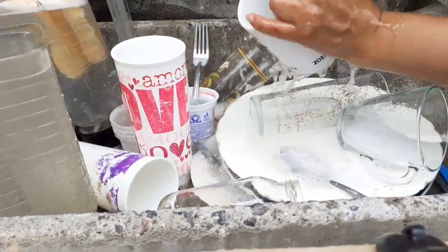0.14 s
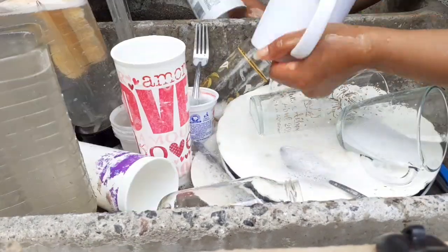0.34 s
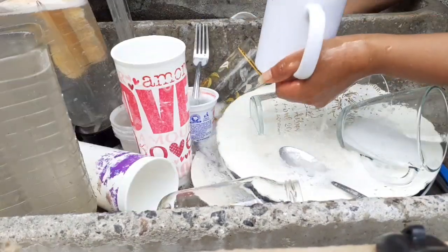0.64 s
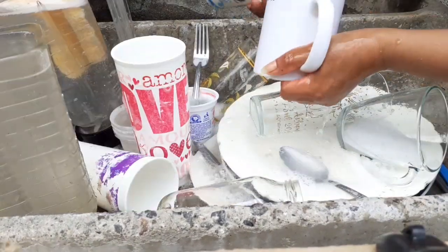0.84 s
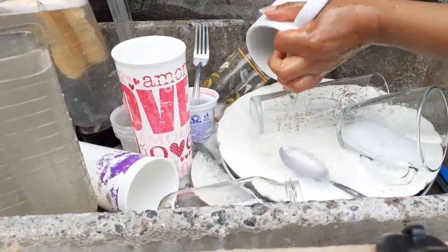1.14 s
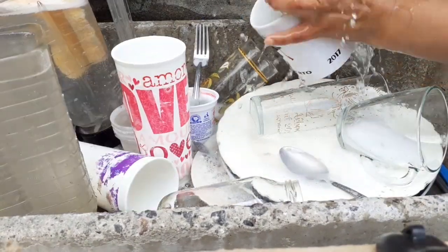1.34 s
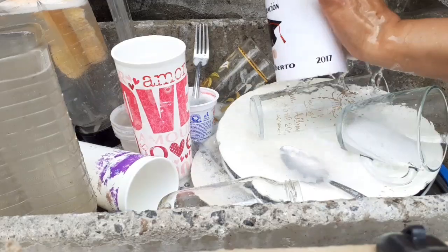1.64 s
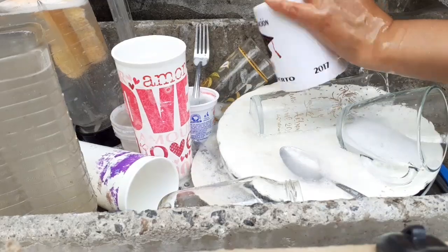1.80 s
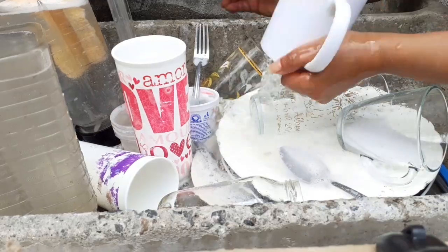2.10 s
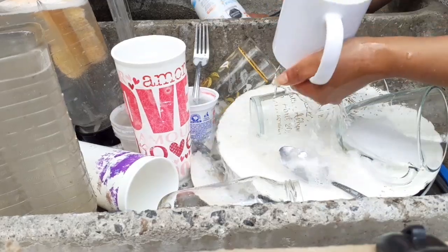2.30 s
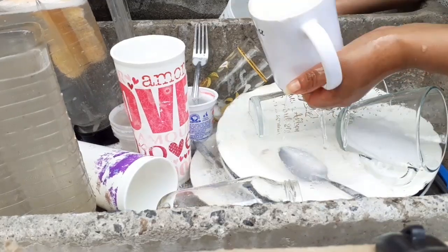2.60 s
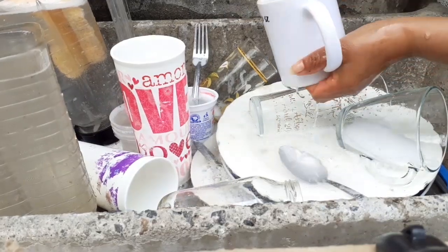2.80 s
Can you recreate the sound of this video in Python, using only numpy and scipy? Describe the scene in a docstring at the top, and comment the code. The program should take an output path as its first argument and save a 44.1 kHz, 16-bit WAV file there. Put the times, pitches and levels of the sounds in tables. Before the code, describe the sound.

Water splashes and burbles close up as a mug is rinsed in an outdoor stone basin. Small plops open; a loud hollow gulp and splash come at 0.5-0.6 s, then sparse drips and sharp slaps from 1.0 to 1.8. A dull crockery knock with a splash lands at 1.9, busier bright splashes follow at 2.0-2.5 with strong low wind buffets on the right, then it thins out.

```python
"""An outdoor stone sink: hands rinse a mug under a running tap, heard close on two microphone ports. Shaped
noise makes the breeze, mostly on the right port, and the tap's wash and spray. Crowds of tiny rings make fizz
and burbles; single climbing rings make bubble plops. Noise bursts with a pitched tick make slaps; groups of
rings make the mug's gulps and a quick burst of low bubbles. Scattered echoes of the plops, slaps, gulps and
bubble burst stand for the stone basin."""
import sys
import numpy as np
from scipy import signal
from scipy.io import wavfile
from scipy.ndimage import uniform_filter1d

SR = 44100
rng = np.random.default_rng(int(sys.argv[2]) if len(sys.argv) > 2 else 0)


def decibels_to_gain(level_db):
    """Convert a level in decibels to a linear amplitude gain (20 dB per decade)."""
    exponent = np.asarray(level_db, float) / 20
    return 10 ** exponent


def store_pcm(level_fs):
    """Save levels as 16-bit WAV."""
    pcm = np.round(np.clip(level_fs, -1, 1) * 32767).astype(np.int16)
    wavfile.write(sys.argv[1], SR, np.atleast_2d(pcm).T)


N = 130095  # samples

# Levels in these tables are relative: the functions below trim them.
# likeness of right port to left: pitch_hz, likeness (0-1)
PORT_LIKENESS = [(60, .15), (180, 1), (550, 0.15), (1650, 0.032), (5000, 0.048), (9000, 1), (15000, 0.98)]
# balance of the ports: pitch_hz, left_minus_right_db
PORT_LEAN = [(500, -2), (2400, -1.5), (8000, -7.5), (11000, 4), (15000, -1)]
# breeze at the ports: time_s, strength_db, left_minus_right_db
BREEZE = [(0.0, -55.5, 3), (0.17, -42.5, -15.5), (0.21, -31.5, -31), (0.25, -33.5, -30), (0.29, -49, -22),
          (0.34, -45.5, -15), (0.46, -28, -28), (0.5, -30, -14), (0.57, -56.5, -3), (0.72, -49, 22),
          (0.88, -48, -5), (1.01, -44, -12), (1.08, -67, 5), (1.125, -36.5, -16), (1.2, -43, 12),
          (1.23, -59, 10), (1.26, -42, -15), (1.47, -44, -10), (1.51, -38, 21), (1.55, -45, 8),
          (1.79, -54.5, 4), (1.83, -36, -16), (1.97, -56, 6), (2.08, -45.5, -3), (2.14, -66, 5),
          (2.18, -24, -35), (2.26, -41.5, -12), (2.3, -29, -14), (2.36, -21.5, -49), (2.4, -40.5, -16),
          (2.44, -27.5, -24), (2.51, -49.5, 0), (2.55, -33.5, -20), (2.58, -53, 6), (2.65, -35, -24),
          (2.69, -34.5, -20), (2.73, -49, 2), (2.78, -56, 3), (2.82, -46, -12), (2.91, -38, 0),
          (2.95, -39, -19)]
# colour of the low wind rumble: pitch_hz, level_db (per Hz)
RUMBLE_COLOUR = [(12, -67), (20, -59), (56, -1.5), (107, -2), (316, -23.5), (392, -44), (464, -36),
                 (600, -45), (780, -64), (1320, -120)]
# colour of the higher wind flutter: pitch_hz, level_db (per Hz)
FLUTTER_COLOUR = [(50, -54), (110, 2), (170, -11.5), (260, 8.5), (380, 4), (520, -11.5), (800, -54)]
# sharp buffets on the right port: centre_s, level_db, pitch_hz
RIGHT_BUFFETS = [(0.208, -13.5, 200), (.248, -13, 214), (0.444, -16.5, 150), (1.269, -22, 240),
                 (2.184, -17, 144), (2.284, -17, 135), (2.3086, -4, 215), (2.3267, -7.5, 303),
                 (2.35, -10.5, 136), (2.371, -10.5, 310), (2.437, -18, 207)]
# colour of the steady wash: pitch_hz, level_db (per Hz)
WASH_COLOUR = [(90, -46), (150, -2), (250, -5.5), (343, -0.5), (528, -10), (1120, -18.5), (1790, -18),
               (3700, -23), (7970, -35.5), (9890, -45), (12500, -37), (15600, -40)]
# how much water is falling: time_s, level_db
WATER_FLOW = [(0.0, -49), (0.06, -43), (0.36, -52), (0.48, -46.5), (0.49, -37.5), (0.57, -46),
              (0.59, -40.5), (0.62, -52.5), (1.26, -53.5), (1.27, -41), (1.39, -53.5), (1.48, -46),
              (1.57, -47.5), (1.6, -38.5), (1.62, -47.5), (1.72, -51.5), (1.77, -48), (1.9, -43),
              (1.92, -34.5), (1.95, -50), (2.1, -40.5), (2.13, -52), (2.22, -40), (2.38, -50), (2.4, -44.5),
              (2.47, -50.5), (2.5, -54), (2.95, -55.5)]
# colour of the spray, the fizz and the slaps: pitch_hz, level_db (per Hz)
SPRAY_COLOUR = [(300, -20), (620, -5), (1000, -6), (1870, -7.5), (3350, -8), (8300, -8), (9890, -20),
                (12500, -11.5), (15600, -19)]
# how hard the water churns in mug and basin: time_s, level_db
WATER_CHURN = [(0.0, -92), (0.06, -47), (0.39, -53), (0.4, -45), (0.42, -44), (0.48, -45.5), (0.5, -25.5),
               (0.57, -47), (0.59, -30.5), (0.63, -51), (0.72, -45.5), (1.17, -59), (1.19, -44),
               (1.22, -67), (1.54, -44), (1.77, -56.5), (1.77, -43), (1.79, -49), (1.84, -37), (1.9, -42.5),
               (1.91, -26.5), (1.95, -51.5), (2.14, -54.5), (2.17, -36.5), (2.29, -43.5), (2.3, -35),
               (2.32, -43.5), (2.39, -47), (2.4, -36.5), (2.56, -67), (2.63, -67), (2.65, -43.5),
               (2.67, -50), (2.95, -52)]
# colour of the burbles: pitch_hz, level_db
BURBLE_COLOUR = [(550, 5.5), (800, 2.5), (1200, 1.5), (1900, 5), (2800, -1), (4000, -8)]
# single bubbles: start_s, level_db, pitch_hz, t60_s (before high pitches are shortened)
BUBBLES = [(0.049, -32.5, 3100, 0.056), (0.077, -25, 1470, 0.021), (0.118, -30, 786, 0.073),
           (.146, -41, 808, .07), (0.183, -25, 775, 0.046), (0.205, -28.5, 753, 0.041),
           (0.396, -32.5, 1068, 0.051), (0.45, -32.5, 3050, 0.046), (0.59, -37, 1816, 0.11),
           (0.698, -37, 1447, 0.096), (0.73, -33, 3320, 0.029), (0.762, -44, 1960, 0.43),
           (1.188, -34.5, 2230, 0.069), (1.273, -28.5, 2940, 0.023), (1.359, -36.5, 883, 0.05),
           (1.531, -33.5, 2360, 0.044), (1.598, -28, 3200, 0.025), (1.636, -34.5, 3130, 0.049),
           (1.773, -25, 1600, 0.031), (1.849, -31.5, 720, 0.12), (1.872, -27, 666, 0.084),
           (1.923, -26, 666, 0.077), (1.981, -29, 803, 0.041), (1.987, -29, 1940, 0.019),
           (2.167, -35.5, 615, 0.09), (2.246, -31.5, 1824, 0.049), (2.263, -33.5, 3360, 0.057),
           (2.297, -29.5, 1810, 0.075), (2.332, -35, 788, 0.12), (2.398, -30.5, 780, 0.057),
           (2.446, -31.5, 810, 0.083), (2.634, -39, 840, 0.08), (2.647, -34.5, 1820, 0.1),
           (2.8, -32.5, 806, 0.11), (2.939, -39, 1100, 0.033), (.036, -38.5, 1723, 0.069),
           (0.079, -33, 2730, 0.04), (0.111, -33, 2540, 0.036), (.184, -32, 2660, 0.035),
           (.255, -38, 1864, 0.15), (.494, -25.5, 2870, 0.041), (0.531, -28, 3260, 0.054),
           (0.546, -29, 1760, 0.059), (.587, -27, 3240, .05), (.875, -32, 1594, 0.04),
           (2.69, -41.5, 2600, 0.05), (.96, -49, 4100, 0.16), (1.733, -40, 2240, 0.062),
           (2.145, -38, 2720, 0.056), (1.774, -36, 2990, 0.063), (1.835, -33, 2330, 0.058),
           (1.846, -33.5, 1970, 0.047), (1.96, -31.5, 800, 0.044), (2.0222, -26, 3640, 0.022),
           (2.404, -31.5, 2250, 0.07), (2.448, -27, 1910, 0.034), (2.494, -29.5, 2630, 0.021)]
# slaps of water: start_s, level_db, centre_hz, t60_s, left_minus_right_db
WATER_SLAPS = [(0.1133, -31.5, 5200, 0.062, 2.5), (0.213, -36, 3950, .015, 2),
               (0.4945, -20, 5770, 0.037, -8), (0.574, -25.5, 4450, 0.037, -4),
               (0.591, -21.5, 4520, 0.015, 3.5), (.779, -34, 2900, 0.022, 0), (.825, -36, 13500, .015, 0),
               (0.998, -26.5, 7950, 0.025, -12), (1.0375, -29, 8800, 0.027, -11),
               (1.083, -30.5, 6370, 0.0092, 4.5), (1.1725, -38.5, 7300, 0.062, 6.5),
               (1.27, -26, 6500, 0.025, 0), (1.3438, -39, 4200, 0.082, 1),
               (1.445, -21.5, 7900, 0.0075, 6.5), (1.474, -30, 4660, 0.056, 0.5),
               (1.511, -33.5, 5650, 0.086, 2), (1.6349, -29.5, 4400, 0.031, 1),
               (1.709, -29.5, 4400, 0.028, 2), (1.7728, -34.5, 5800, 0.043, 1.5),
               (1.823, -30, 7250, 0.05, 0.5), (1.909, -36, 8740, 0.038, -1), (1.9187, -36, 7260, 0.023, 0),
               (1.9751, -20.5, 7980, 0.019, 1), (2.0474, -20, 6770, 0.013, -3.5),
               (2.066, -15.5, 13600, 0.013, 0), (2.1803, -25, 4600, 0.042, 0.5),
               (2.2085, -20, 6200, 0.034, -2), (2.221, -30, 4760, 0.028, 6),
               (2.2467, -19, 15500, 0.022, 4.5), (2.26, -24, 4720, 0.027, -3),
               (2.2968, -33, 6200, 0.063, 3), (2.3976, -31, 6860, 0.054, 0.5),
               (2.475, -20, 1480, 0.0093, -3), (2.4935, -29.5, 4250, 0.024, -1.5),
               (2.811, -40.5, 7450, 0.037, 2)]
# gulps of air in the mug: start_s, level_db, emptiness (0-1, raises the pitch)
AIR_GULPS = [(0.4961, -5, 0.03), (.519, -27, 0.08), (0.531, -8, 0.01), (0.5399, -18.5, 0),
             (.574, -18, 0.05), (.587, -24, 0.1), (.61, -31, 0.1), (2.404, -17, 0.1), (2.44, -24.5, 0.08),
             (2.468, -25, 0.16)]
# resonances of the air in the mug: pitch_hz, level_db, t60_s
MUG_AIR = [(310, -2.5, 0.05), (413, -1.5, 0.092), (800, -13, 0.022)]
# a quick burst of low bubbles under water: start_s, level_db, pitch_hz, t60_s
BUBBLE_BURST = [(1.909, -12, 702, 0.022), (1.9075, -18, 1510, 0.0064), (1.9111, -16, 1020, 0.015),
                (1.9165, -30, 590, 0.022), (1.9181, -16.5, 376, 0.026), (1.9209, -19, 529, 0.047),
                (1.925, -22.5, 3200, 0.013), (1.929, -25, 480, 0.033), (1.931, -23, 1130, 0.0084)]


def evened(x):
    """Scales a sound to an rms of one."""
    return x / np.sqrt(np.mean(x ** 2) + 1e-20)


def read(points, hz):
    """Reads a table at the given pitches, along a logarithmic pitch axis."""
    point_hz, value = np.transpose(points)
    return np.interp(np.log(hz + 1), np.log(point_hz + 1), value)


def curve(rows, axis=1):
    """Draws one column of a timed table as a value for every sample."""
    rows = np.array(rows)
    return np.interp(np.arange(N) / SR, rows[:, 0], rows[:, axis])


def add(mix, start_s, sound):
    """Lays a sound into the mix, cut off where the mix ends."""
    part = mix[round(start_s * SR):][:len(sound)]
    part += sound[:len(part)]


def hiss(spectrum, patchy_db, flicker_db, size=512, alike=True):
    """Two channels of coloured noise with drifting patches and a flicker shared by all pitches."""
    frames, hz = 4 * N // size + 5, np.fft.rfftfreq(size, 1 / SR)
    a, b, c, d, patches = rng.standard_normal((frames, len(hz), 5)).T
    flicker = evened(uniform_filter1d(patches[0], size=3))
    patches = uniform_filter1d(patches, size=8, axis=0)  # smooth over pitch
    patches = evened(uniform_filter1d(patches, size=6, axis=1))  # then over time
    same = np.clip(read(PORT_LIKENESS, hz), 0, 1)[:, None] * alike
    left = a + 1j * b
    right = same * left + np.sqrt(1 - same ** 2) * (c + 1j * d)
    lean_db = read(PORT_LEAN, hz)[:, None] / 2 * np.array([1, -1])[:, None, None]
    level_db = read(spectrum, hz)[:, None] + lean_db + patchy_db * patches + flicker_db * flicker
    z = np.array([left, right]) * decibels_to_gain(level_db)
    return evened(signal.istft(z, nperseg=size, noverlap=size * 3 // 4)[1][:, :N])


def ring(hz, t60, glide=0., rise_s=.001):
    """A dying sine (t60 at least 4 ms) whose pitch climbs by twice the glide, as a share per second."""
    t = np.arange(round(.25 * SR)) / SR
    envelope = (1 - np.exp(-t / rise_s)) * decibels_to_gain(-60 * t / max(t60, .004))
    return envelope * np.sin(2 * np.pi * hz * t * (1 + glide * t))


def grains(rate, spread_db, colour, lo_hz, hi_hz, cycles, glide):
    """Bubbles of 30 sizes at random moments, each dying 60 dB in so many cycles (4 ms at least)."""
    out = np.zeros((2, N))
    for hz in np.geomspace(lo_hz, hi_hz, num=30):
        luck, loudness, side = rng.random((N, 3)).T
        hits = (luck < rate / 30 / SR) / np.sqrt(rate)  # crowding leaves the mean power alone
        hits = hits * decibels_to_gain(-spread_db * np.log(loudness + 0.0091))
        drop = ring(hz, cycles / hz, glide=hz * glide, rise_s=0.093 / hz)[:3000]
        drop = decibels_to_gain(read(colour, hz)) * np.sqrt(hz) * drop
        placed = hits * np.array([side, 1 - side]) ** 1.47
        out += signal.oaconvolve(placed, drop[None], axes=1)[:, :N]
    return evened(out)


def wind():
    """Lumpy rumble, unrelated at each port; strong gusts add a higher flutter and sharp buffets."""
    threshold_db = -23.5
    strength_db, pan_db = curve(BREEZE), curve(BREEZE, axis=2)
    port_db = strength_db + 6 - 10 * np.log10(1 + decibels_to_gain(2 * np.array([-pan_db, pan_db])))
    over_db = port_db - threshold_db
    rumble = hiss(RUMBLE_COLOUR, 0., 0.97, size=2048, alike=False)
    flutter = hiss(FLUTTER_COLOUR, 0., 3.3, size=1024, alike=False)
    out = decibels_to_gain(threshold_db + 0.82 * over_db) * rumble
    out += decibels_to_gain(threshold_db - 10 + 1.81 * over_db) * flutter  # grows faster than the rumble
    t = np.arange(-800, 800) / SR
    for centre_s, level_db, hz in RIGHT_BUFFETS:
        pulse = np.exp(-(t * hz / .82) ** 2) * np.cos(2 * np.pi * hz * t + .5)
        add(out[1], centre_s + t[0], -decibels_to_gain(level_db) * pulse)
    return out


def wash():
    """Steady, mostly low noise of the running water."""
    return decibels_to_gain(-45) * hiss(WASH_COLOUR, 0.87, 1.24)


def spray():
    """Patchy bright noise that follows the falling water."""
    return decibels_to_gain(curve(WATER_FLOW) - 5.5) * hiss(SPRAY_COLOUR, 3.2, 1.7, size=256)


def fizz():
    """Fine droplets, 1800 a second, whose level follows the falling water."""
    return decibels_to_gain(curve(WATER_FLOW) - 2.5) * grains(1800, 4, SPRAY_COLOUR, 1543.0, 15780.0, 35.0, 0.0065)


def burbles():
    """Larger bubbles; harder churning makes them louder and packs them closer together."""
    churn_db = curve(WATER_CHURN)
    rate = 900 * decibels_to_gain(0.43 * (churn_db + 48))  # 900 a second at -48 dB
    return decibels_to_gain(churn_db - 2) * grains(rate, 3, BURBLE_COLOUR, 534.0, 4044.0, 33.0, 0.0036)


def plops():
    """Bubbles climb in pitch, shake in loudness on the restless surface and bring six fainter ones."""
    glide, rise_s = 1.34, 0.00073
    out = np.zeros(N)
    for (start_s, level_db, hz, t60), (lags, sizes) in zip(BUBBLES, rng.random((len(BUBBLES), 2, 6))):
        t60 = t60 * min(1, (780 / hz) ** .5)  # smaller, higher bubbles die sooner
        pure = ring(hz, t60, glide, rise_s)
        wobble = evened(uniform_filter1d(rng.standard_normal(len(pure)), size=int(5 * SR / hz)))
        add(out, start_s, decibels_to_gain(level_db) * pure * (1 + 0.38 * wobble))
        mate_gain = decibels_to_gain(level_db - 11) * min(1, hz / 2000)
        for lag, size in zip(lags, sizes):
            mate_hz = hz * (1 + 0.304 * (2 * size - 1))
            add(out, start_s + 0.018 * lag, mate_gain * ring(mate_hz, 0.51 * t60, glide, rise_s))
    return out


def sink(x):
    """Quick reflections off the stone basin, different in each ear."""
    t = np.arange(round(.2 * SR)) / SR
    taps = rng.standard_normal((len(t), 2)).T * (rng.random((len(t), 2)).T < .05)  # sparse echoes
    taps = taps * decibels_to_gain(-60 * t / 0.07) * (t > .002)  # t60 0.07 s, first echo after 2 ms
    return signal.fftconvolve(x[None], taps / np.linalg.norm(taps[0]), axes=1)[:, :N]


def slaps():
    """A pitched tick inside a short wide burst, reaching the left port one or two samples first."""
    out, t = np.zeros((2, N)), np.arange(4000) / SR
    colour = hiss(SPRAY_COLOUR, 0.8, 0.)
    noises = rng.standard_normal((len(WATER_SLAPS), len(t)))
    lags = rng.integers(1, 3, len(WATER_SLAPS))
    for (start_s, level_db, hz, t60, pan_db), noise, lag in zip(WATER_SLAPS, noises, lags):
        band = np.clip([hz * (1 - 0.11), hz * (1 + 0.11)], 100, .45 * SR)
        tick = evened(signal.sosfilt(signal.butter(2, band, "band", fs=SR, output="sos"), noise))
        tick = tick * decibels_to_gain(-60 * t / (0.42 * t60))
        tone = decibels_to_gain(2.0) * ring(hz, min(60. / hz, t60), 0., 0.00017)[:len(t)]
        wide_gain = decibels_to_gain(2 - 60 * t / t60) * np.minimum(t60 / 0.044, 1.5)  # longer slaps are wider
        for side in (0, 1):
            wide = colour[side, round(start_s * SR):][:len(t)]
            burst = np.minimum(t / 0.00019, 1) * (tick + tone + wide_gain * wide)
            gain = decibels_to_gain(level_db - 10.5 + pan_db * (1.5 - side))
            add(out[side], start_s + side * lag / SR, gain * burst)
    return out


def gulps():
    """Each gulp rings the air in the mug, higher the emptier it is and climbing as it dies."""
    out = np.zeros(N)
    for start_s, level_db, empty in AIR_GULPS:
        air = sum(decibels_to_gain(mode_db) * ring(hz * (1 + empty), t60, 1.0, 0.0026) for hz, mode_db, t60 in MUG_AIR)
        add(out, start_s, decibels_to_gain(level_db) * air)
    return out


def bubble_burst():
    """A quick volley of low bubbles bursting together under water, each a short ring of steady pitch."""
    out = np.zeros(N)
    for start_s, level_db, hz, t60 in BUBBLE_BURST:
        add(out, start_s, decibels_to_gain(level_db) * ring(hz, t60, 0., 0.00057))
    return out


def scene():
    """Sums breeze, water, near sounds leaning slightly left (0.8 dB louder at the left port), and basin
    reflections."""
    breeze = wind()
    water = wash() + spray() + fizz() + burbles()
    near = plops() + gulps() + bubble_burst()
    splash = slaps()
    reflections = decibels_to_gain(-3) * sink(near + splash.mean(0))
    return near * decibels_to_gain(np.array([[.4], [-.4]])) * 0 + breeze + water + splash + reflections \
        + near * decibels_to_gain(np.array([[.4], [-.4]]))


def top_cut(x):
    """Nothing passes above the cut-off."""
    return signal.sosfilt(signal.butter(12, 16820, fs=SR, output="sos"), x)


def record(dry):
    """The microphone drops the bass below 55 Hz; then a band limit at 15.9 kHz."""
    dry = signal.sosfilt(signal.butter(2, 55, "high", fs=SR, output="sos"), dry)
    band_limit = signal.firwin(255, 15900, window=("kaiser", 6), fs=SR)
    dry = signal.oaconvolve(dry, band_limit[None], "same")
    return top_cut(dry)


dry = scene()
out = record(dry)
store_pcm(out)
```